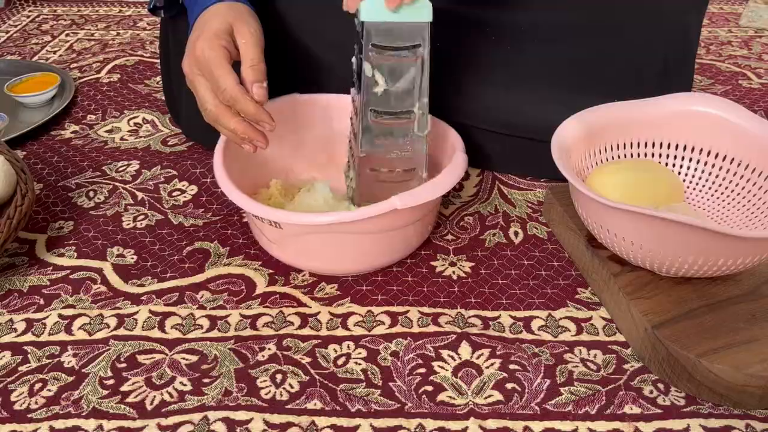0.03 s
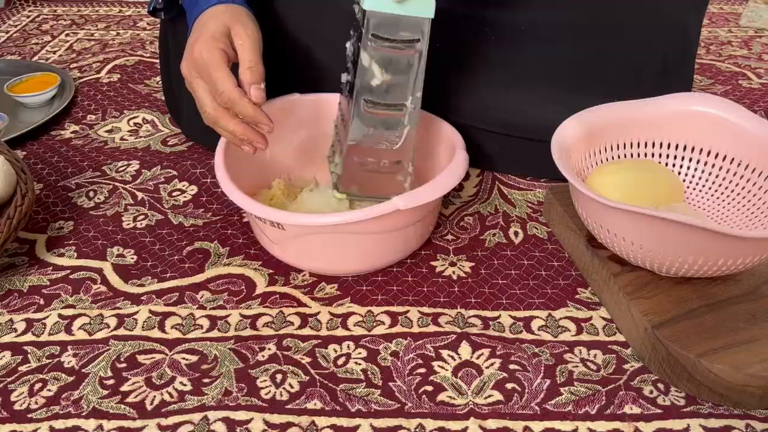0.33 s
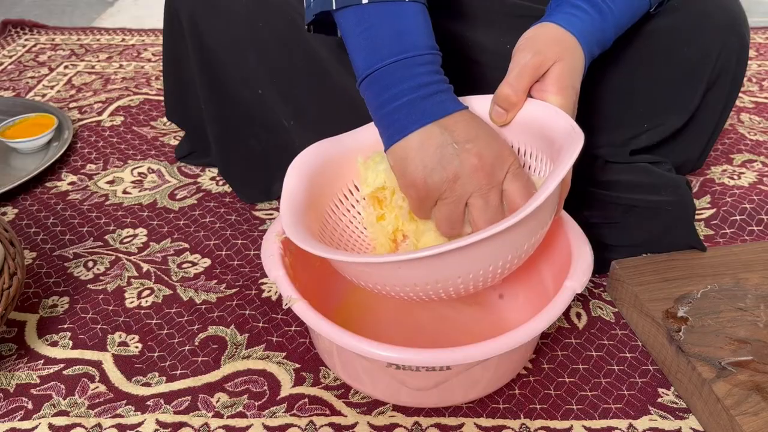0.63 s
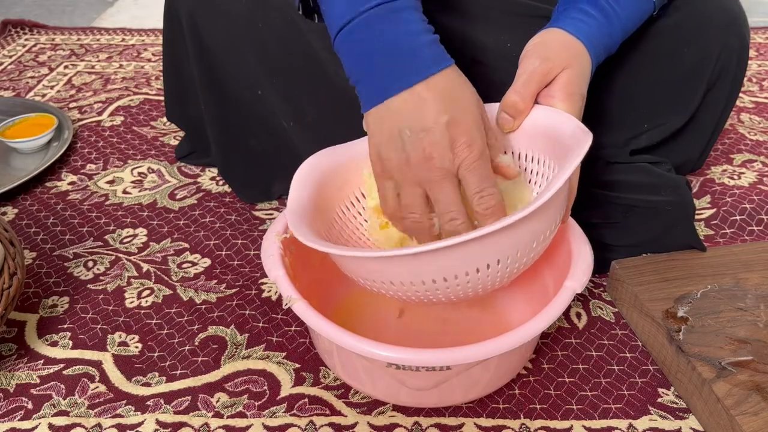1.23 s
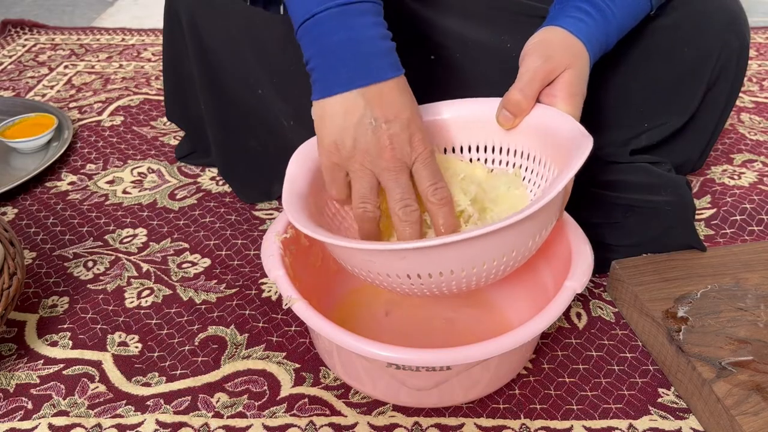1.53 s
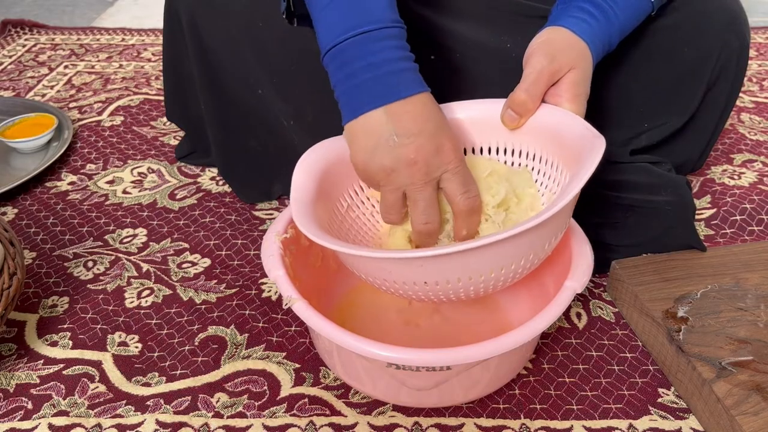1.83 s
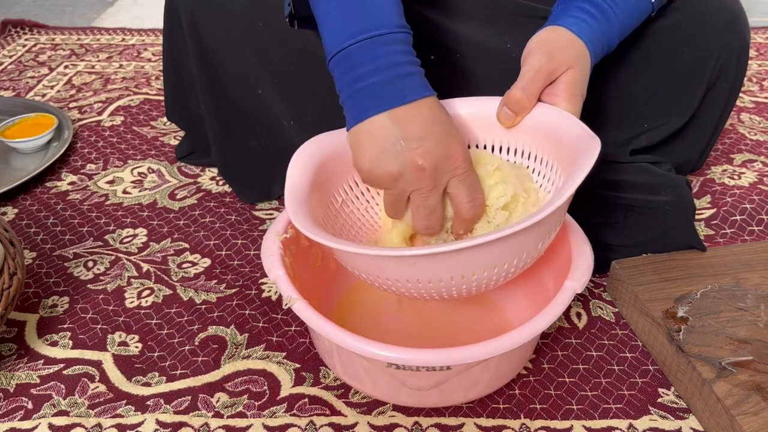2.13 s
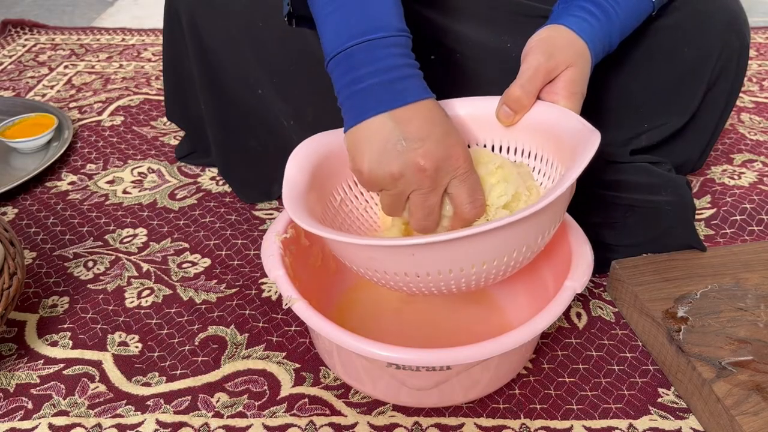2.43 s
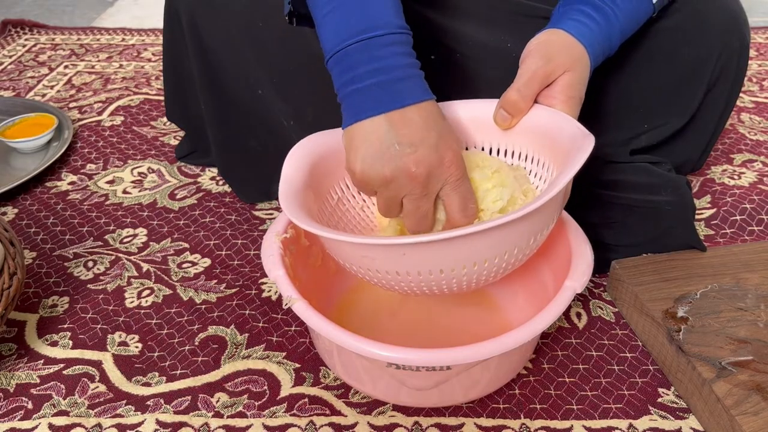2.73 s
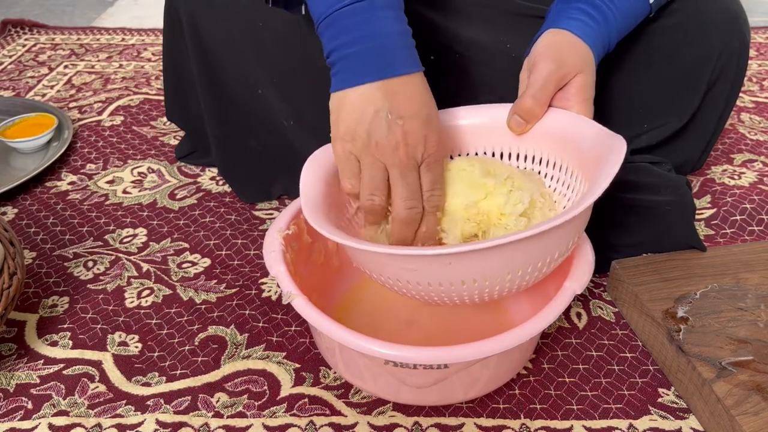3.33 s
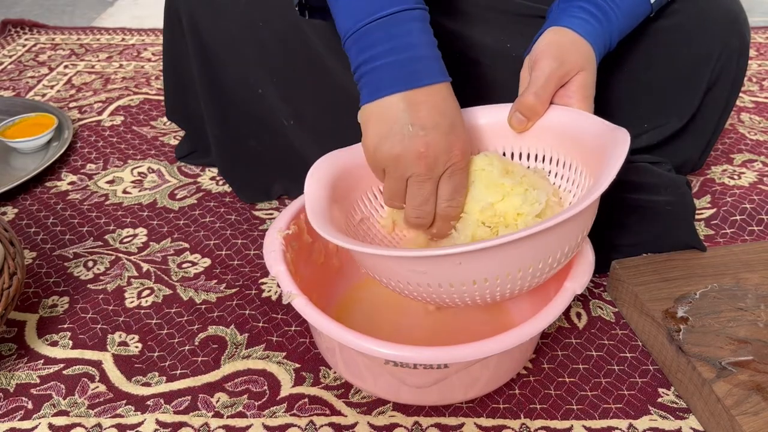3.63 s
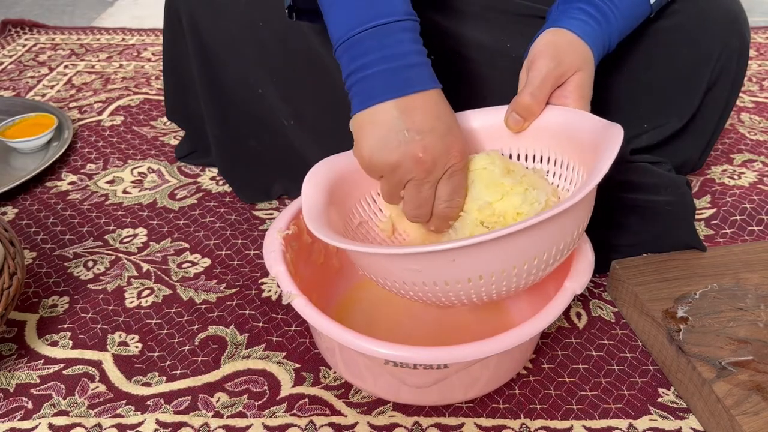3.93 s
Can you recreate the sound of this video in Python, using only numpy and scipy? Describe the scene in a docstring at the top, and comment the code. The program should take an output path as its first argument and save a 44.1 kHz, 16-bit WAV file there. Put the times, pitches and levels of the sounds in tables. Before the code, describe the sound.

A hand squeezes wet pulp following two knocks on a plastic bowl, as a songbird chirps.

```python
"""Over a faint outdoor rumble a metal grater knocks twice on a plastic bowl: crack, thud, ring, rattle.
A songbird chirps close by in the courtyard, each note a quick gliding whistle.
Hard cut to a second scene: the bird is farther off and a hand squeezes wet grated food in a colander.
Each squeeze is a swarm of tiny bursting juice films, with louder pops and two plops of collapsing air.
The courtyard walls echo the bird and, more faintly, the handwork."""
import sys
import numpy as np
from scipy import signal
from scipy.fft import rfft, irfft
from scipy.io import wavfile

SR = 44100
rng = np.random.default_rng(int(sys.argv[2]) if len(sys.argv) > 2 else 0)


def inscribe(sig):
    """Save sig as 16-bit PCM at rate SR to the path in sys.argv[1].

    A 1-D sig is mono; a 2-D sig holds one channel per row.
    Samples are clipped to [-1, 1] before scaling.
    """
    pcm = np.round(np.clip(np.atleast_2d(sig).T, -1, 1) * 32767)
    wavfile.write(sys.argv[1], SR, pcm.astype(np.int16))


N = 176400
CUT_S = .406

# outdoor bed EQ: f/Hz, level/dB
AIR_EQ = [(25, -13.5), (64, 1), (88, -1), (186, -13.5), (318, -15.5), (427, -20), (637, -20.5),
          (1670, -33.5), (3930, -33.5), (7090, -43), (8320, -45), (12100, -42.5), (15000, -83)]
# grater hits on the bowl: t/s, thud/dB, crack/dB, crack centre/Hz, ring/dB, rattle/dB
KNOCKS = [(0.033, -1, 8.5, 1918, -29.5, -37.5), (0.3472, 3, 11, 2060, -26.5, -37)]
# plastic bowl modes: f/Hz, level/dB, t60/s
BOWL_MODES = [(132.7, -1, 0.22), (315, 3.5, 0.088), (474, 9.5, 0.076), (692, -0.5, 0.044),
              (1375, -12, 0.086), (2000, -8.5, 0.09), (2175, -13, 0.08), (2957, -12, .06)]
# EQs of the knock layers: f/Hz, level/dB
THUD_EQ = [(50, -10.5), (125, -3), (235, -10.5), (340, 1.5), (430, 3.5), (485, 8), (570, -19.5), (690, -7),
           (820, -22.5), (1000, -12), (2700, -21), (16000, -35.5)]
RATTLE_EQ = [(100, 5.5), (400, 1.5), (850, -11.5), (2200, -13), (3200, -12), (6500, -16.5), (16000, -37)]
# bird notes: t/s, length/s, first f/Hz, middle f/Hz, last f/Hz, level/dB
BIRD_NOTES = [(0.075, 0.027, 4260, 4960, 4420, -37), (0.096, 0.034, 4263, 4050, 3465, -32),
              (0.139, 0.035, 3560, 4400, 3296, -33), (0.176, 0.036, 3630, 3170, 2620, -47.5),
              (0.383, 0.026, 4180, 5045, 4625, -38), (0.447, 0.022, 4450, 5100, 5070, -57.5),
              (0.56, 0.056, 4400, 4000, 3505, -63), (0.627, 0.029, 3950, 4320, 3110, -66),
              (0.656, 0.039, 3356, 3930, 2920, -61.5), (0.715, 0.083, 3720, 4540, 2990, -67),
              (0.788, 0.045, 2700, 2934, 2880, -66.5), (1.055, 0.081, 5670, 5700, 5710, -74),
              (1.196, .03, 2870, 3614, 2900, -66.5), (1.701, 0.028, 3830, 4880, 3320, -65.5),
              (1.736, 0.037, 3320, 3590, 3110, -66), (1.784, 0.048, 3850, 5050, 4780, -69),
              (2.245, 0.035, 3490, 4670, 3270, -66.5), (2.292, 0.0379, 2940, 3516, 2850, -64.5),
              (2.479, 0.048, 5350, 5900, 6170, -73.5), (2.541, 0.027, 3745, 5320, 3760, -62.5),
              (2.636, 0.032, 5160, 4110, 3350, -60), (2.688, 0.056, 3504, 4346, 2850, -55),
              (2.789, 0.063, 3290, 3100, 2640, -65.5), (3.255, 0.037, 5086, 4250, 3580, -53),
              (3.307, 0.055, 3750, 4170, 2770, -56), (3.89, 0.064, 5100, 5660, 5650, -78.5),
              (3.961, 0.033, 4040, 5300, 4590, -60)]
# hand squeezes: peak t/s, rise/s, fall/s, squelch/dB, crackle/dB, fizz/dB
SQUEEZES = [(1.035, 0.085, 0.036, -74, -83, -74), (1.131, 0.014, 0.012, -60, -56.5, -55),
            (1.219, 0.1, 0.056, -82, -68.5, -79), (1.518, 0.011, 0.06, -59.5, -62.5, -64),
            (1.627, 0.012, 0.011, -51, -64.5, -58), (1.878, 0.17, 0.093, -82, -71, -74),
            (2.147, 0.27, 0.072, -89, -82.5, -70.5), (2.38, 0.011, 0.013, -81, -79, -74),
            (2.78, 0.023, 0.026, -59, -63, -58.5), (3.154, 0.019, 0.035, -68, -63, -74),
            (3.29, 0.051, 0.033, -56, -56, -63), (3.41, 0.069, 0.085, -72.5, -77, -72)]
# EQs of the juice layers: f/Hz, level/dB
SQUELCH_EQ = [(80, 4.5), (250, -8.5), (550, 4), (800, -4), (1150, -0.5), (1900, 0), (2700, -20.5),
              (8000, -42)]
CRACKLE_EQ = [(200, 4), (800, -34), (1400, -9), (2000, 0.5), (2700, -1.5), (3500, 6.5), (5000, -2.5),
              (16000, -34)]
FIZZ_EQ = [(1000, -29), (3500, -5.5), (6000, 2), (8400, 2), (13000, -0.5), (16000, -6)]
POP_EQ = [(200, -38), (800, -16.5), (1350, -4), (2000, 7.5), (2700, -4), (4500, -2.5), (7500, -9.5),
          (13500, -12), (16000, -62)]
# larger juice films bursting: t/s, level/dB
POPS = [(1.1275, -56), (1.135, -50), (1.4156, -48.5), (1.5009, -45), (1.509, -38.5), (1.5267, -39),
        (1.5463, -38.5), (1.611, -45), (2.7512, -52), (2.782, -41.5), (3.128, -48.5), (3.147, -43.5),
        (3.152, -44), (3.1609, -46), (3.178, -51), (3.208, -47), (3.2136, -43), (3.224, -47),
        (3.230, -38.5), (3.2425, -42), (3.2585, -50), (3.271, -38), (3.280, -37), (3.2873, -33),
        (3.299, -41)]
# air pockets collapsing in the pulp: t/s, f/Hz, level/dB
PLOPS = [(1.629, 580, -49.5), (2.7811, 1143, -46.5)]

GRAINS_PER_S, GRAIN_SPREAD_DB, GRAIN_TOP_DB, GRAIN_PAN = 2400, 5.5, 17, 0.37
SMEAR_S, SMEAR_GAIN = 0.0021, 0.94
YARD_T60_S, ECHO_DECAY_S, YARD_WIDTH, HANDS_SEND_DB = 0.59, 0.033, 0.62, -13


def undb(db):
    """Decibels to gain."""
    return 10 ** (np.asarray(db) / 20)


def unit(x):
    """Scale to rms 1."""
    return x / np.sqrt(np.mean(x ** 2))


def pan(db):
    """Channel gains, the left louder by db."""
    return undb(np.array([[db], [-db]]) / 2)


def colour(x, eq):
    """Minimum-phase EQ that keeps the power of white noise."""
    hz, db = np.array(eq, float).T
    f = np.fft.rfftfreq(2 * N, 1 / SR)
    gain = unit(undb(np.interp(np.log(f + 1), np.log(hz), db)))
    cepstrum = irfft(np.log(gain))[:N]
    cepstrum[1:] *= 2
    return irfft(rfft(x, 2 * N) * np.exp(rfft(cepstrum, 2 * N)))[..., :N]


def walk(hz):
    """Smooth random modulator, rms 1."""
    knots = rng.standard_normal(N)
    return unit(np.interp(np.arange(N) * hz / SR, np.arange(N), knots))


def stereo_noise(side):
    """Mid/side noise; more side is wider."""
    m, s = rng.standard_normal((2, N))
    return unit(np.array([m + side * s, m - side * s]))


def tail(decay_s, side):
    """Diffuse reverb tail, unit energy per channel."""
    h = (stereo_noise(side) * np.exp(-np.arange(N) / SR / decay_s))[:, :SR]
    return h / np.sqrt(np.sum(h ** 2) / 2)


def through(x, h):
    """Convolve with a stereo response."""
    return signal.fftconvolve(np.atleast_2d(x), h, axes=1)[:, :N]


def click(s):
    """A unit impulse at time s."""
    return 1. * (np.arange(N) == int(s * SR))


def outdoor_air(level_db=-62.5, swell_db=1.2):
    """A faint, gently wavering bed of rumble and hiss."""
    swell = undb(level_db + swell_db * walk(hz=5.43))
    return swell * colour(stereo_noise(side=0.36), AIR_EQ) * pan(db=0.65)


def bowl_ring(age):
    """The struck bowl's modes bloom and die away, phase-shifted between the ears."""
    out = 0
    for hz, db, t60 in BOWL_MODES:
        envelope = undb(db - 60 * age / t60) * (1 - np.exp(-age * hz / 2.1))
        ear_phase = np.array([[0], [1]]) * min(hz / 550, 1.3)
        out = out + envelope * np.sin(2 * np.pi * hz * age + ear_phase)
    return out


def grater_knocks(t, bounce_s=0.023, bounce_db=-16, rattle_decay_s=0.048, grit_db=4.5):
    """Metal hits plastic: a crack, a thud and a ring, then the grater bounces once and rattles."""
    f, out = np.fft.rfftfreq(N, 1 / SR), 0
    bend = np.exp(-2j * np.pi * 1.6 * np.log(1 + f / 30))  # bending waves bring the lows late
    for s, thud_db, crack_db, crack_hz, ring_db, rattle_db in KNOCKS:
        age = np.maximum(t - s, 0)
        contacts = click(s) + undb(bounce_db) * click(s + bounce_s)
        crack = irfft(bend * rfft(contacts) / (1 + 1j * (f - crack_hz) / 310) ** 2)
        thud = irfft(bend * rfft(colour(click(s), THUD_EQ)))
        grit = unit(undb(grit_db * walk(hz=427.2)))
        chatter = stereo_noise(side=0.44) * grit * (t > s) * np.exp(-age / rattle_decay_s)
        rattle = colour(chatter, RATTLE_EQ)
        body = undb(thud_db) * thud + undb(ring_db) * bowl_ring(age) + undb(rattle_db) * rattle
        out = out + undb(crack_db) * crack + body * pan(db=2.0)
    return out


def songbird(t, notes, flutter_db=1.8, third_db=-32):
    """Gliding whistles with a faint third harmonic, roughened by fast pitch and level jitter."""
    out = np.zeros(N)
    warble = 1 + .021 * walk(hz=900)
    flutter = undb(flutter_db * walk(hz=300.2))
    for s, length, first, middle, last, db in notes:
        i = np.flatnonzero((t > s) & (t < s + length))
        progress = (t[i] - s) / length
        hz = np.interp(progress, [0, .5, 1], [first, middle, last])
        phase = 2 * np.pi * np.cumsum(hz * warble[i]) / SR
        envelope = undb(db) * np.sqrt(np.abs(np.sin(np.pi * progress))) * flutter[i]
        out[i] += envelope * (np.sin(phase) + undb(third_db) * np.sin(3 * phase))
    return out * pan(db=4.5)


def pulp_smear(pulses, eq):
    """Pulp and colander add a short blur to each bursting film."""
    scattered = pulses * np.sign(rng.standard_normal(N))
    return colour(pulses + SMEAR_GAIN * through(scattered, tail(SMEAR_S, side=0.13)), eq)


def squeezes(t):
    """Hand pressure builds and eases, bursting tiny juice films: low squelch, crackle and fine fizz."""
    out = 0
    for layer, eq in enumerate((SQUELCH_EQ, CRACKLE_EQ, FIZZ_EQ)):
        power = sum((undb(levels[layer]) * np.exp(np.minimum((t - s) / rise, (s - t) / fall))) ** 2
                    for s, rise, fall, *levels in SQUEEZES)
        envelope = np.sqrt(power / (1 + SMEAR_GAIN ** 2))  # leave room for the smear's power
        sizes = undb(np.minimum(GRAIN_SPREAD_DB * rng.exponential(size=N), GRAIN_TOP_DB))
        polarity = np.sign(rng.standard_normal(N))
        grains = unit(sizes * polarity * (rng.random(N) < GRAINS_PER_S / SR))
        spread = 1 + GRAIN_PAN * rng.standard_normal(N) * np.array([[1], [-1]])
        out = out + pulp_smear(grains * envelope * spread, eq)
    return out


def juice_pops(t, decay_s=0.0003):
    """Larger films burst in sharp ticks of noise."""
    bursts = sum(undb(db) * (t > s) * np.exp(-np.abs(t - s) / decay_s) for s, db in POPS)
    return pulp_smear(bursts * stereo_noise(side=0.36), POP_EQ)


def air_plops(t, decay_s=0.005):
    """Air pockets collapse in the pulp, each a short damped tone."""
    out = 0
    for s, hz, db in PLOPS:
        age = np.maximum(t - s, 0)
        out = out + undb(db) * np.sin(2 * np.pi * hz * age) * np.exp(-age / decay_s)
    return out


def scene():
    """Knocks with a close bird, then a hard cut to squeezing with a distant one, in one courtyard."""
    t = np.arange(N) / SR
    reverb = undb(-1) * tail(YARD_T60_S / np.log(1000), YARD_WIDTH)
    early_echo = undb(0.5) * tail(ECHO_DECAY_S, YARD_WIDTH)
    yard = (reverb + early_echo) * np.minimum(t[:SR] / 0.012, 1)  # 12 ms fade-in
    out = outdoor_air()
    knocking = grater_knocks(t)
    squeezing = squeezes(t) + juice_pops(t) + air_plops(t)
    for hands, before_cut, bird_db, echo_db in ((knocking, True, 0, -4), (squeezing, False, -3, 0)):
        bird = songbird(t, [note for note in BIRD_NOTES if (note[0] < CUT_S) == before_cut])
        echo = through(bird + undb(HANDS_SEND_DB) * hands, yard)
        gate = (t < CUT_S) == before_cut
        out = out + gate * (hands + undb(bird_db) * bird + undb(echo_db) * echo)
    return out


def record(dry, knee_hz=5060, lag_s=0.00014, low_cut_hz=28, high_cut_hz=15600):
    """Two microphone ports drift out of phase in the treble; filters trim the sub-bass and the top."""
    turn = np.pi * lag_s * np.maximum(np.fft.rfftfreq(2 * N, 1 / SR) - knee_hz, 0)
    ports = irfft(rfft(dry, 2 * N) * np.exp(1j * turn * np.array([[-1], [1]])))[:, :N]
    ports = signal.sosfilt(signal.butter(2, low_cut_hz, "high", fs=SR, output="sos"), ports)
    return signal.sosfilt(signal.ellip(8, .2, 70, high_cut_hz, fs=SR, output="sos"), ports)


dry = scene()
out = record(dry)
inscribe(out)
```